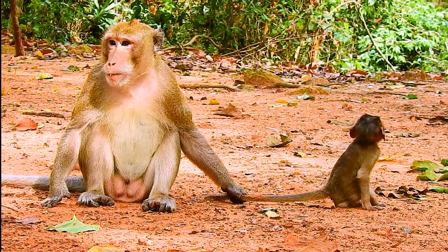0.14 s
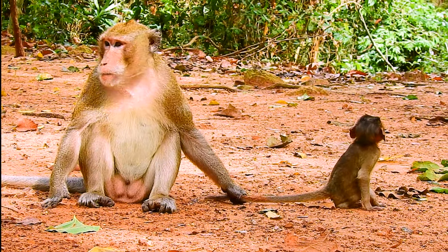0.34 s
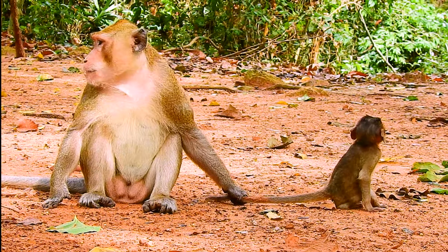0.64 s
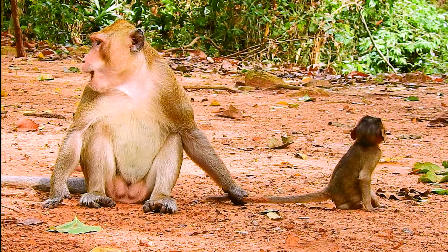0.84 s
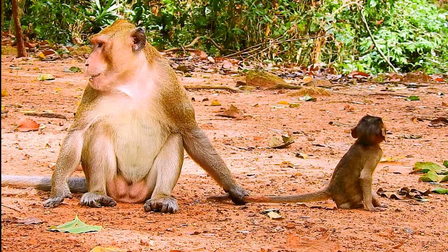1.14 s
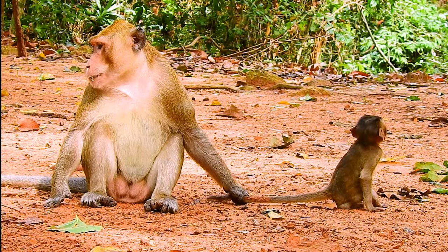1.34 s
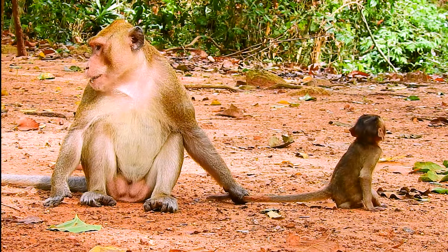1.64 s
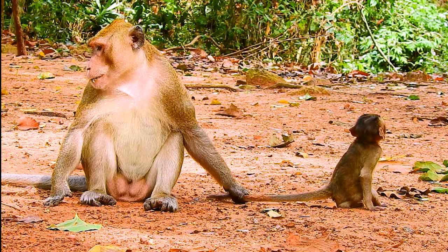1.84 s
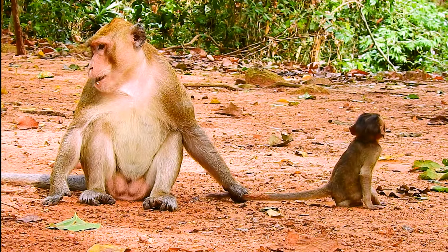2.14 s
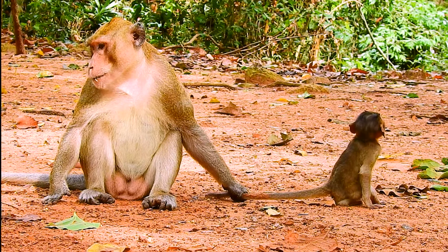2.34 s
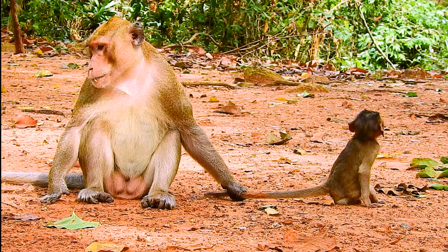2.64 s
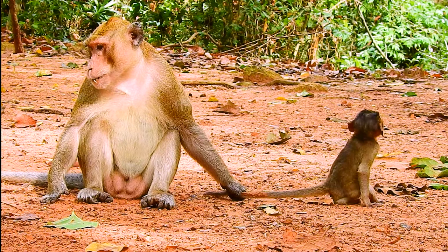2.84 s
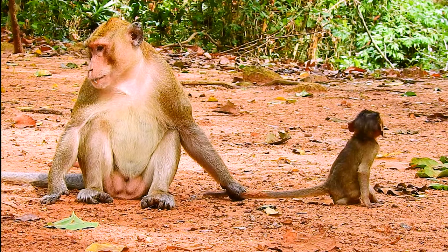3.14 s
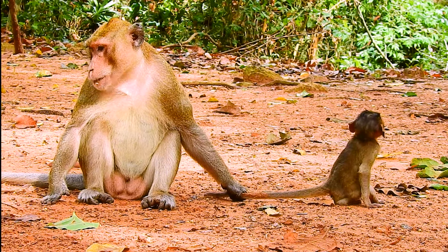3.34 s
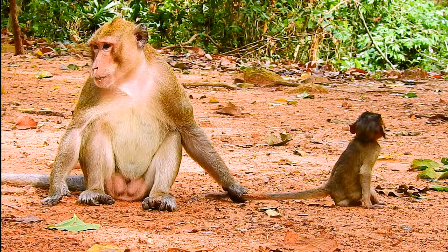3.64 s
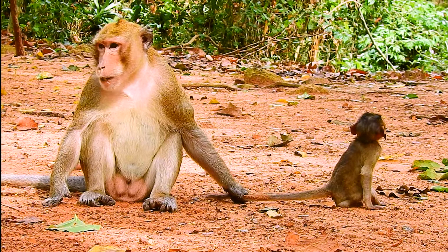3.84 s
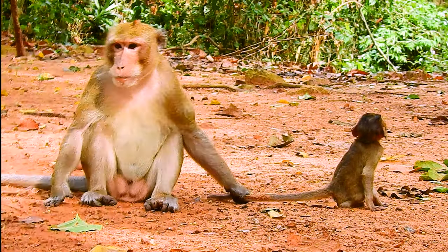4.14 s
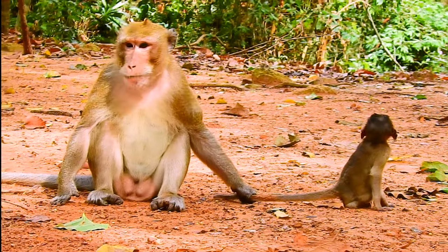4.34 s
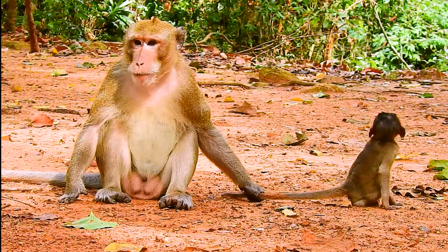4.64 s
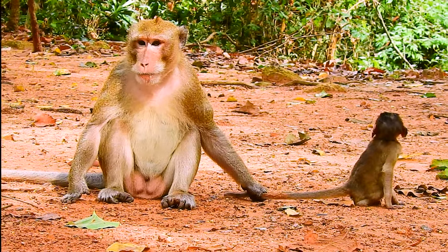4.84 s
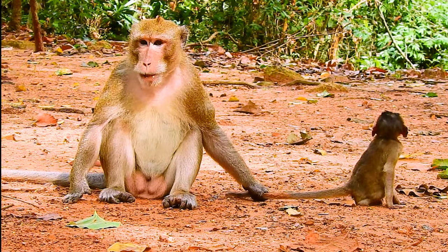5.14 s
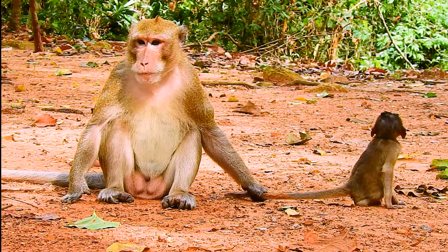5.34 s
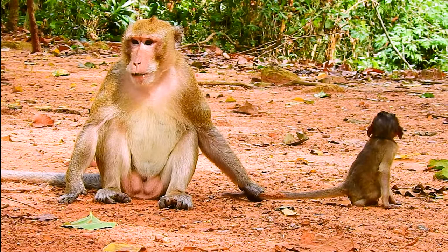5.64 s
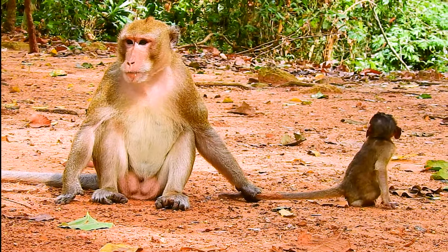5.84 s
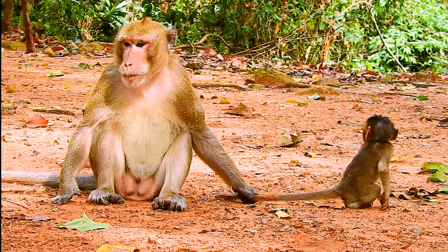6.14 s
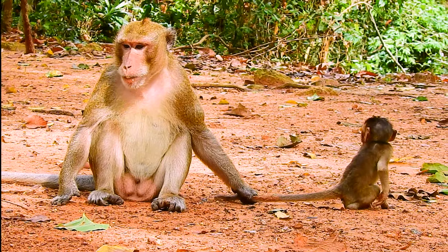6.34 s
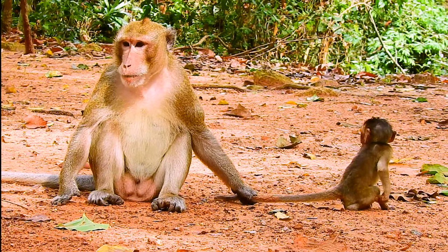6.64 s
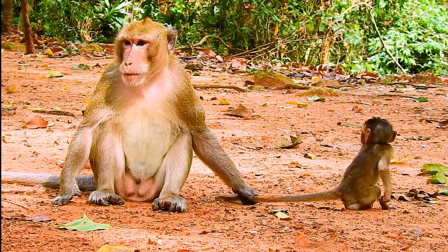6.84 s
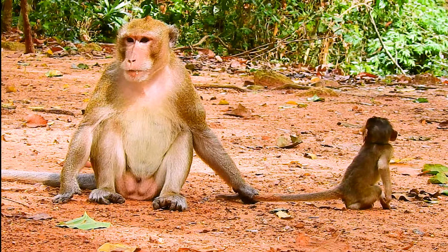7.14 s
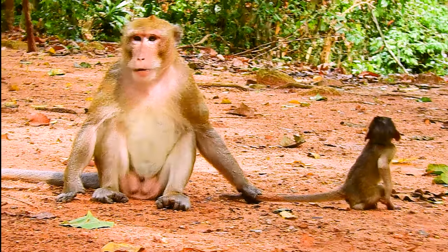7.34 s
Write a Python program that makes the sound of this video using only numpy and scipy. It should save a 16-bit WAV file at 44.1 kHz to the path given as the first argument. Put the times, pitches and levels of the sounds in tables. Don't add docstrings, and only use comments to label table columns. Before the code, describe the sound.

Dense, buzzing high-pitched insect drone outdoors, with echoing far-off whoops, a low passing engine rumble, and small twig and grit ticks.

```python
import sys
import numpy as np
from scipy import signal
from scipy.fft import rfft, irfft, next_fast_len
from scipy.io import wavfile
from scipy.ndimage import uniform_filter1d, map_coordinates

SR = 44100
rng = np.random.default_rng(int(sys.argv[2]) if len(sys.argv) > 2 else 0)


def rack_gain(trim_db):
    fader = np.asarray(trim_db, float)
    return 10 ** (fader / 20)


def waveform_to_disk(signal):
    frames = np.transpose(np.atleast_2d(signal))
    scaled = np.clip(frames, -1, 1) * 32767
    samples = np.round(scaled).astype(np.int16)
    wavfile.write(sys.argv[1], SR, samples)


N = 330734
SIZE = next_fast_len(N + SR)
HZ = np.fft.rfftfreq(SIZE, 1 / SR)
TIME = np.arange(N) / SR

# frequency in Hz, side minus mid in dB.
WIDTH = [(60, -16), (88, -25), (130, -19), (190, -18), (270, -17.5), (400, -18), (580, -19.5), (850, -14.5),
         (1250, -14), (1820, -6.5), (2670, -6.5), (3900, -8.5), (5690, -5), (8320, -2.5)]

# frequency in Hz, level in dB per Hz.
LEAF_COLOUR = [(290, -48), (500, -4), (585, -4), (1180, -5.5), (1730, -5), (2210, -5.5), (2950, -5.5),
               (3600, 1), (4680, -30), (7920, -120)]
# frequency in Hz, level in dB per Hz.
SHIMMER_COLOUR = [(8000, -40), (8800, -1), (9100, 0), (9500, 0), (10000, -4), (10400, -10), (11000, -14),
                  (12000, -18), (13500, -22), (15700, -26), (19000, -60)]
# frequency in Hz, width in Hz, start and end in seconds, level in dB.
LEAF_RUSTLES = [(2300, 1800, .27, .315, -60), (2000, 1600, .325, .36, -61), (2750, 200, 4.252, 4.268, -62),
                (2400, 3000, .499, .518, -52), (2300, 1800, .525, .56, -63), (2030, 160, 4.97, 5.035, -68),
                (3300, 350, 4.69, 4.74, -62), (3150, 200, 4.96, 5, -66), (3400, 200, 5.16, 5.225, -62),
                (2000, 170, 5.795, 5.86, -66), (1800, 200, 5.775, 5.81, -68), (3480, 350, 1.61, 1.64, -60),
                (2420, 60, 1.612, 1.65, -62), (830, 60, 5.785, 5.86, -68), (2500, 90, 2.03, 2.1, -67),
                (385, 30, 2.3, 2.37, -54), (385, 30, 2.55, 2.62, -55), (1660, 60, 6.35, 6.41, -69),
                (2250, 90, 6.44, 6.49, -68)]

# frequency in Hz, level in dB per Hz.
ENGINE_COLOUR = [(12, -44.5), (20, -9), (38, -8.5), (97, -1), (133, 0), (200, -3.5), (260, -42),
                 (440, -120)]
# frequency in Hz, level in dB per Hz.
BODY_COLOUR = [(76, -43), (130, -7.5), (200, -4.5), (264, -1), (307, -2.5), (477, -10), (520, -8),
               (680, -24), (1140, -120)]
# frequency in Hz, level in dB per Hz.
TYRE_COLOUR = [(240, -22), (400, -6.5), (477, -3.5), (537, -4), (740, 0), (1360, -8), (1550, -10),
               (2040, -16.5), (3000, -18.5), (3900, -54), (6600, -120)]
# frequency in Hz, width in Hz, start and end in seconds, level in
# dB.
VEHICLE_LINES = [(96.3, 6.3, 4.5, 4.1, -55), (272, 24, 2.5, 3.54, -54), (733, 50, 2, 3.08, -60),
                 (877, 80, 3.05, 3.4, -59), (486, 48, 2.5, 3.1, -62), (255.6, 24, 2.5, 4.1, -56),
                 (99.8, 8, 2.5, 3.17, -54.5), (68.5, 3.2, 0.5, 7.2, -63.5), (68, 6, 4.5, 4.9, -66),
                 (100.5, 8.6, 2, 2.5, -56), (265, 57, -0.5, 1.54, -59), (715, 69, 0, 1.5, -65),
                 (1050, 23, 2, 2.07, -64.5)]
# time in seconds, tyre level in dB.
VEHICLE_PASS = [(0, -61), (.4, -60), (.85, -57), (1.2, -52), (1.8, -55.5), (2.25, -53), (2.7, -57),
                (3.4, -56), (3.95, -57.5), (4.3, -63), (4.8, -65.5), (5.4, -69.5), (7.5, -71)]

# time in seconds, peak level in dB.
GRIT_TICKS = [(0.4998, -49), (1.1588, -63), (1.4716, -45), (1.5544, -62), (2.1196, -52), (3.3074, -49),
              (4.7182, -49), (5.216, -49), (5.5089, -51), (5.6156, -49), (5.9604, -51), (6.2098, -49),
              (6.6682, -46)]
# time in seconds, peak level in dB, pitch in Hz, 60 dB decay in seconds.
TWIG_KNOCKS = [(.338, -45, 1150, .025), (.4986, -29, 1400, .007), (.4988, -31, 2300, .008),
               (.499, -40, 296, .13), (.4979, -39, 1100, .008), (.5022, -42, 1200, .01),
               (.505, -41, 1700, .008), (.5082, -42, 1000, .01), (.5098, -40, 2200, .006),
               (.5104, -40, 1500, .008), (.5048, -44, 3300, .008), (.4992, -45, 3300, .006),
               (.4983, -38, 650, .012), (.5095, -45, 3000, .008), (2.067, -39, 1150, .016),
               (2.0695, -42, 780, .016), (2.0715, -38, 1720, .016), (2.0685, -44, 2350, .014),
               (2.0705, -44, 3450, .012), (2.073, -49, 2900, .01), (4.222, -48, 2400, .015),
               (4.255, -45, 2300, .012), (4.263, -43, 2200, .015), (4.277, -45, 2000, .025),
               (4.279, -47, 2800, .02)]

# start and end in seconds, first and
# last pitch in Hz, level in dB.
FAR_NOTES = [(2.36, 2.565, 1576, 1600, -69), (2.477, 2.577, 2570, 2550, -67),
             (2.584, 2.64, 2380, 2300, -71), (3.1, 3.138, 2310, 2350, -63),
             (3.156, 3.274, 2530, 2480, -65.5), (6.279, 6.34, 3020, 3180, -68),
             (6.456, 6.56, 1776, 1720, -69), (6.278, 6.435, 2300, 2400, -76),
             (7.094, 7.15, 2130, 2350, -73)]
# time in seconds, pitch in Hz, level in dB.
WHOOPS = [
    [(1.265, 874, -52), (1.309, 890, -49), (1.337, 976, -57), (1.381, 1060, -41), (1.447, 1128, -48.5),
     (1.469, 1177, -44.5), (1.579, 1222, -43.5), (1.611, 1214, -45), (1.655, 916, -53)],
    [(1.815, 1050, -65.5), (1.829, 1035, -46.5), (1.845, 1143, -44), (1.867, 1160, -57),
     (1.901, 1249, -42.5), (1.937, 1265, -41.5), (1.993, 1265, -43.5), (2.029, 1193, -47),
     (2.056, 1070, -50)],
    [(3.91, 909, -58), (3.92, 915, -46.5), (3.964, 941, -56), (3.994, 1005, -49.5), (4.14, 1061, -44.5),
     (4.18, 1083, -49), (4.196, 1068, -49.5), (4.206, 1036, -48), (4.22, 898, -63)],
    [(4.615, 1105, -65), (4.623, 1107, -54.5), (4.691, 1060, -48.5), (4.757, 1195, -50.5),
     (4.773, 1211, -49), (4.885, 1203, -46.5), (4.907, 1194, -47), (4.937, 1094, -51), (4.948, 1050, -52)],
    [(5.135, 994, -64), (5.149, 1054, -51.5), (5.167, 1125, -49), (5.205, 1148, -52.5),
     (5.243, 1236, -46.5), (5.325, 1280, -47), (5.395, 1252, -48), (5.417, 1176, -52), (5.432, 1033, -57)],]
# time in seconds, pitch in Hz, level in dB.
FINAL_WHOOP = [(7.145, 940, -58), (7.165, 988, -51), (7.213, 975, -55), (7.245, 1025, -51),
               (7.34, 1050, -49), (7.37, 1115, -44.5), (7.415, 1202, -46), (7.46, 1110, -45),
               (7.5, 1060, -51)]
# partial number, start and end in seconds, level in dB.
THROAT_OVERTONES = [(3, 1.32, 1.36, -66), (3, 1.362, 1.485, -57), (3, 1.52, 1.585, -62),
                    (2, 1.375, 1.425, -65), (2, 1.46, 1.6, -70), (2, 1.51, 1.56, -60.5),
                    (2, 1.89, 2.018, -57.5), (3, 1.83, 1.91, -62), (2, 3.925, 3.98, -64.5),
                    (3, 3.4, 3.995, -79), (3, 4.025, 4.1, -53), (3, 4.1, 4.2, -59), (2, 4.13, 4.5, -68.5),
                    (2, 4.745, 4.92, -57.5), (2, 4.92, 4.945, -79), (3, 5, 5.2, -69), (3, 5.9, 4.885, -73),
                    (3, 4.9, 4.945, -67), (3, 4.5, 5.23, -69), (2, 5.225, 5.31, -57.5),
                    (2, 5.315, 4.8, -59), (2, 5.345, 5.4, -55), (3, 5.33, 5.4, -68), (3, 7.232, 7.265, -64),
                    (3, 7.268, 7.355, -57.5), (3, 7.355, 8.5, -66), (2, 7.38, 7.49, -66.5),
                    (3, 7.455, 9.5, -62)]

# frequency in Hz, level in dB per Hz.
OPENING_COLOUR = [(2120, -45), (3600, -40.5), (4000, -26), (4160, -29.5), (4810, -12), (5460, -3.5),
                  (5710, -4), (6110, -2), (6270, -1), (6560, 0.5), (7390, 2.5), (7990, -2), (8770, -18),
                  (11400, -7), (19300, -120)]
# frequency in Hz, level in dB per Hz.
LOW_COLOUR = [(2120, -66), (3600, -25.5), (3850, -24), (4160, -20.5), (4370, -13), (4730, -2.5), (5420, -7),
              (5740, 0.5), (6000, 3), (6320, -4), (6630, -9), (6960, 0.5), (7250, -1.5), (8770, -17),
              (11400, -16), (19300, -120)]
# frequency in Hz, level in dB per Hz.
CLOSING_COLOUR = [(2120, -70), (3600, -55), (4150, -25), (4740, -16.5), (4800, -16.5), (5170, -7),
                  (5500, -5.5), (5860, -7.5), (6250, -18), (6440, -1.5), (6660, -3.5), (6810, -2),
                  (7200, -1.5), (7470, -1.5), (8770, -20), (11400, -39), (19300, -120)]
# frequency in Hz, level in dB per Hz.
LEAD_COLOUR = [(5200, -57), (6050, -2), (6300, 3.5), (6470, -6.5), (6650, -2.5), (6850, -24), (7800, -55.5)]
# muscle cycles per second, level in dB.
CHOIR_SINGERS = [
    [(97.2, 0), (94.6, -4), (101, -5), (107, -5), (90, -5)],
    [(111, 0), (104, -4), (92, -4), (99, -4), (118, -5)],
    [(97.6, 0), (112, -1), (102, -4), (93, -4), (120, -5)],
    [(86.4, 3), (106, 0), (96, -2)],
]
# left over right in dB, left lead in seconds, share of the echo pattern.
CHOIR_SEATS = [(0.6, 18e-6, 1.3), (-0.2, 0.000019, 0.76), (0.5, 0.000019, 1.1), (-0.5, 0.000031, 0.58)]
# choir number, full voice from and until in seconds, level in dB.
CHOIR_SONGS = [(0, -1.5, 2.1, -28.5), (0, 6, 9, -34.5), (1, 2.42, 4, -29), (1, 8, 5.6, -30),
               (2, 4.5, 9, -29.5), (3, -5, 2.7, -50), (3, 3, 4, -35), (3, 5.5, 9, -37.5)]
# swell in dB per second, fade in dB per second, resting murmur in dB.
CHOIR_HABITS = [(15, 11.5, -42.5), (21, 22, -46.5), (16, 10, -42.5), (87.4, 5, -47)]
# frequency in Hz, width in Hz, level in dB.
ECHO_RIPPLE = [(3628, 73, -3.3), (3876, 48, 4.3), (3919, 41, -5.4), (3973, 54, 3.5), (4027, 60, -3.3),
               (4500, 65, 3.1), (4716, 133, 2.7), (4899, 112, 2.5), (5211, 118, 3.1), (5286, 55, -3.2),
               (5362, 90, 2.9), (5534, 138, -3.0), (5749, 33, -2.7), (5803, 68, 3.2), (6008, 35, 2.5),
               (6062, 53, -3.9), (6105, 45, 2.3), (6438, 57, 2.7), (6503, 180, 3.6), (6869, 101, -3.2),
               (7052, 51, -3.1), (7117, 169, 3.0), (7181, 68, 1.5), (7250, 120, 1.5), (7472, 39, 3.1),
               (7558, 221, -2.7), (8430, 93, 3.1), (8495, 50, -2.4), (8538, 111, 3.4), (9475, 97, 3.9)]
# frequency in Hz, width in Hz, start and end in
# seconds, level in dB.
INSECT_NOTES = [(3975, 40, 1, 1.75, -64), (3925, 50, 2.1, 4.2, -61.5), (3850, 70, 6.05, 9.1, -68),
                (4250, 460, 6, 9.9, -55.5), (6590, 130, 3.5, 5.3, -38), (6230, 53, 4.5, 6.9, -45),
                (7270, 60, 4.5, 5.45, -37.5), (7220, 56, 5.3, 6.05, -45), (7250, 100, 5.7, 6.3, -42),
                (7380, 54, 5.5, 7.6, -40), (6340, 60, 3, 5.15, -38), (6470, 40, 5, 5.65, -41),
                (6510, 80, 5.5, 6.5, -38), (6530, 68, 6.5, 7.6, -41), (7300, 60, 4.5, 3.6, -43),
                (7450, 13, 4.5, 7.6, -45.5), (4960, 21, 5, 5.3, -45.5), (6830, 210, -0.5, 3.14, -42),
                (7780, 83, 3.5, 2.6, -52.5), (8350, 70, 5, 6.9, -54), (7180, 110, 2.5, 1, -44),
                (7860, 46, 7, 8.4, -48), (4480, 220, 3.2, 4.65, -47.5)]


def unit(x):
    return x / np.sqrt(np.mean(x ** 2) + 1e-20)


def along(points):
    hz, value = np.transpose(points)
    return np.interp(np.log(HZ + 1), np.log(hz + 1), value)


def curves(rows):
    s, *columns = np.transpose(rows)
    return [np.interp(TIME, s, column) for column in columns]


def between(start, end):
    return slice(int(start * SR), min(int(end * SR), N))


def wobble(rate, t=TIME):
    knots = rng.standard_normal(int((t[-1] - t[0]) * rate) + 4)
    return map_coordinates(knots, [(t - t[0]) * rate])


def stereo(pair, gain, wide_db=0):
    width = [np.ones(len(HZ)), rack_gain(along(WIDTH) + wide_db)]
    mid, side = irfft(pair * gain * width, SIZE)[:, :N]
    return np.array([mid + side, mid - side]) / np.std(mid)


def rush(gain, wide_db=0):
    return stereo(rfft(rng.standard_normal((2, N)), SIZE), gain, wide_db)


def band(hz, width_hz, start, end, db, ramp_s):
    swell = np.clip(np.minimum(TIME - start, end - TIME) / ramp_s + .5, 0, 1)
    return rack_gain(db) * swell * rush(1 / (1 + (2 * (HZ - hz) / width_hz) ** 2))


def patchy(x, depth_db, bins, frames):
    z = signal.stft(x, nperseg=512)[2]
    field = uniform_filter1d(rng.standard_normal(z.shape[1:]), bins, 0)
    field = uniform_filter1d(field, frames, 1)
    return signal.istft(z * rack_gain(depth_db * unit(field)), nperseg=512)[1][:, :N]


def forest(t60, direct):
    t = np.arange(SR // 2) / SR
    tail = rng.standard_normal((2, len(t))) * rack_gain(-60 * t / t60)
    tail = tail / np.linalg.norm(tail[0])
    tail[0, 0] = direct
    return rfft(tail, SIZE) / [[np.hypot(1, direct)], [1]]


def seated(pair, pan_db, lead_s):
    side = np.array([[.5], [-.5]])
    lead = np.exp(2j * np.pi * side * lead_s * HZ)
    return irfft(rfft(pair, SIZE) * rack_gain(side * pan_db) * lead, SIZE)[:, :N]


def air():
    leaves = patchy(rush(rack_gain(along(LEAF_COLOUR))), depth_db=2.5, bins=6, frames=14)
    shimmer = patchy(rush(rack_gain(along(SHIMMER_COLOUR)), wide_db=2.5), depth_db=1.5, bins=30, frames=6)
    rustles = sum(band(*row, ramp_s=.012) for row in LEAF_RUSTLES)
    return rack_gain(-65.5) * leaves + rack_gain(-59.5 + 1.2 * wobble(8)) * shimmer + rustles


def traffic():
    tyre_db, = curves(VEHICLE_PASS)
    engine_db = -53 + .34 * (tyre_db + 51)
    pass_s, turn_s = 2.37, .26
    body_db = tyre_db - 1 + 8.5 / (1 + np.exp((pass_s - TIME) / turn_s))
    side = np.array([[1], [-1]])
    engine = rack_gain(engine_db) * rush(rack_gain(along(ENGINE_COLOUR)))
    body = rack_gain(body_db + .6 * side) * rush(rack_gain(along(BODY_COLOUR)), wide_db=-3)
    tyres = rack_gain(tyre_db + 1.2 * side) * rush(rack_gain(along(TYRE_COLOUR)), wide_db=2.5)
    lines = sum(band(*row, ramp_s=.2) for row in VEHICLE_LINES)
    return patchy(engine + body + tyres + lines, depth_db=1.5, bins=3, frames=12)


def ground():
    out, t = np.zeros((2, N + SR)), np.arange(SR // 8) / SR
    for s, db in GRIT_TICKS:
        pan_db = rng.normal(0, 3.7)
        click = rack_gain(db + 9 - 60 * t / .0008) * np.cos(2 * np.pi * 13000 * t)
        out[:, round(s * SR) + 55:][:, :len(t)] += click * rack_gain([[pan_db], [-pan_db]])
    for s, db, hz, t60 in TWIG_KNOCKS:
        b, a = signal.butter(2, [hz / 1.35, hz * 1.35], "band", fs=SR)
        puff = unit(signal.lfilter(b, a, rng.standard_normal(len(t))))
        ring = np.sin(2 * np.pi * hz * t)
        out[:, round(s * SR):][:, :len(t)] += rack_gain(db - 60 * t / t60) * (.9 * ring + .2 * puff)
    return out[:, :N]


def bird(start, end, first_hz, last_hz, db):
    span, out = between(start, end), np.zeros(N)
    t = TIME[span]
    u = np.clip((t - start) / (end - start), 0, 1)
    pitch = (first_hz + (last_hz - first_hz) * u) * (1 + .012 * wobble(120, t))
    swell = np.sqrt(2 * np.abs(np.sin(np.pi * u))) * rack_gain(db + 1.4 * wobble(54, t))
    out[span] = swell * np.sin(2 * np.pi * np.cumsum(pitch) / SR)
    return out


def whoop(rows):
    first_s, last_s = rows[0][0], rows[-1][0]
    span, out = between(first_s, last_s), np.zeros(N)
    t = TIME[span]
    pitch, level_db = [c[span] for c in curves(rows)]
    cut_off = span.stop == N
    gate = np.clip(np.minimum(t - t[0], last_s - t + cut_off) / .0022, 0, 1)
    phase = 2 * np.pi * np.cumsum(pitch * (1 + .0033 * wobble(62.7, t))) / SR
    leak_db, opening_s = -40, .02
    sizes = {1: rack_gain(level_db), 2: rack_gain(level_db + leak_db), 3: rack_gain(level_db + leak_db)}
    for k, start, end, db in THROAT_OVERTONES:
        opening = np.clip(np.minimum(t - start, end - t) / opening_s + .5, 0, 1)
        sizes[k] = np.maximum(sizes[k], rack_gain(db) * opening)
    voice = 0
    # number, flicker in dB, phase scatter in radians.
    for k, flicker_db, scatter in ((1, 1, 0), (2, 1.5, .15), (3, 2.5, .33)):
        flicker = rack_gain(flicker_db * wobble(40, t))
        voice = voice + sizes[k] * flicker * np.sin(k * phase + scatter * wobble(150, t))
    out[span] = np.sqrt(2) * gate * voice
    return out


def calls():
    voices = sum(whoop(rows) for rows in WHOOPS + [FINAL_WHOOP])
    voices = voices + sum(bird(*row) for row in FAR_NOTES)
    tilt = np.minimum(HZ / 1400, 2)
    mid, side = irfft(rfft(voices, SIZE) * tilt * forest(.55, direct=0), SIZE)[:, :N]
    echo = np.array([mid + .19 * side, mid - .78 * side])
    return voices * rack_gain([[.15], [-.15]]) + rack_gain(-13) * echo


def singer(cycles, drift, jitter_s, scatter_db):
    buckles = np.cumsum(4 * cycles * (1 + drift * wobble(1.5)) / SR)
    at = np.flatnonzero(np.diff(np.floor(buckles)))
    luck = rng.standard_normal((len(at), 2))
    ribs = rack_gain(rng.normal(0, 3.1, 4))[np.arange(len(at)) % 4]
    clicks = ribs * rack_gain(scatter_db * luck[:, 0])
    at = np.clip(at + np.round(jitter_s * SR * luck[:, 1]).astype(int), 0, N - 1)
    return unit(np.bincount(at, clicks, N))


def choir_levels():
    power = [np.full(N, rack_gain(2 * rest_db)) for *_, rest_db in CHOIR_HABITS]
    for choir, start, end, db in CHOIR_SONGS:
        swell, fade, _ = CHOIR_HABITS[choir]
        before, after = np.maximum(start - TIME, 0), np.maximum(TIME - end, 0)
        power[choir] += rack_gain(2 * (db - swell * before - fade * after))
    return np.sqrt(power)


def cicadas():
    out = 0
    rolloff_db = .02 * np.maximum(HZ - 8800, 0)
    ripple_db = sum(1.54 * db * np.exp(-(4.8 * (HZ - hz) / w) ** 2) for hz, w, db in ECHO_RIPPLE)
    colours = (OPENING_COLOUR, LOW_COLOUR, CLOSING_COLOUR, LEAD_COLOUR)
    for level, colour, choir, seat in zip(choir_levels(), colours, CHOIR_SINGERS, CHOIR_SEATS):
        pan_db, lead_s, share = seat
        near = 0
        for cycles, db in choir:
            clicks = singer(cycles, drift=.004, jitter_s=4e-5, scatter_db=1.5)
            near = near + rack_gain(db) * rfft(clicks, SIZE) * forest(.35, direct=.57)
        far = rack_gain(-5) * rfft(rng.standard_normal((2, N)), SIZE)
        gain = rack_gain(along(colour) + share * ripple_db - rolloff_db)
        out = out + level * seated(stereo(near + far, gain, wide_db=-2), pan_db, lead_s)
    out = out + sum(band(*row, ramp_s=.12) for row in INSECT_NOTES)
    return patchy(out, depth_db=1.1, bins=2, frames=120)


def scene():
    return air() + traffic() + ground() + calls() + cicadas()


def roll_off(x):
    return signal.sosfilt(signal.butter(12, 15830, fs=SR, output="sos"), x)


def record(dry):
    held_db, averaging_s, grip = -28, .05, .5
    power = np.abs(uniform_filter1d(dry.mean(0) ** 2, size=int(averaging_s * SR)))
    level_db = 10 * np.log10(power + 1e-12)
    mix = dry * rack_gain(grip * (held_db - level_db))
    return roll_off(mix)


dry = scene()
out = record(dry)
waveform_to_disk(out)
```